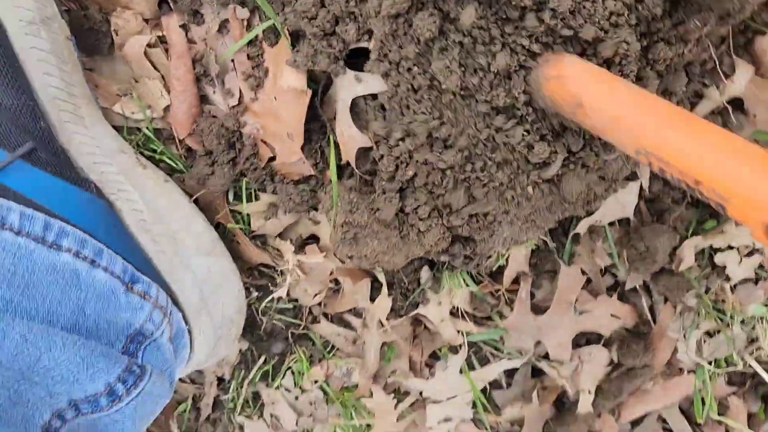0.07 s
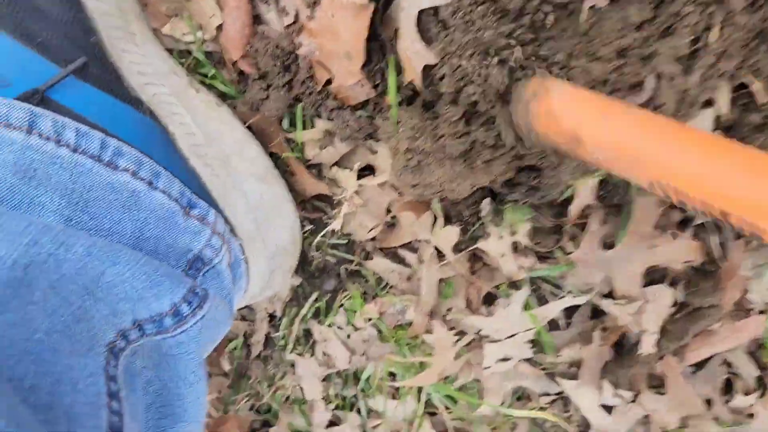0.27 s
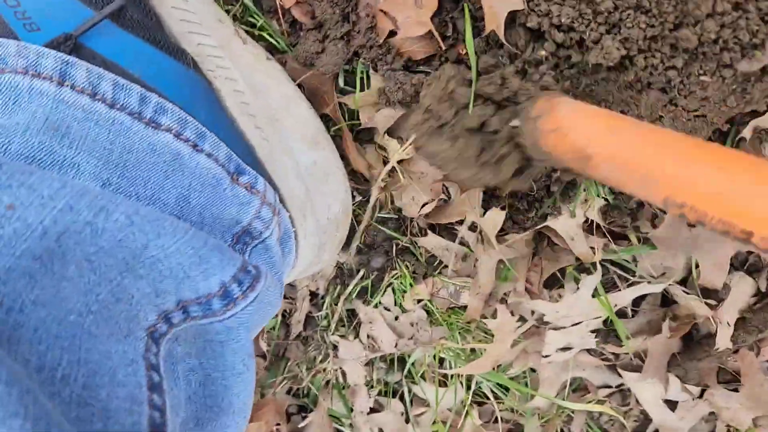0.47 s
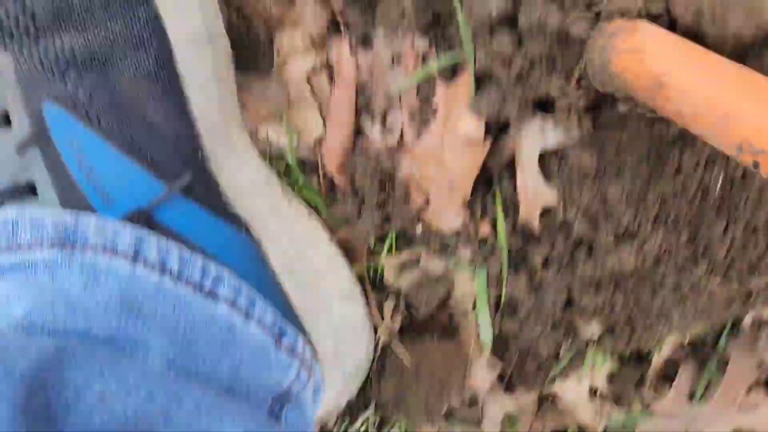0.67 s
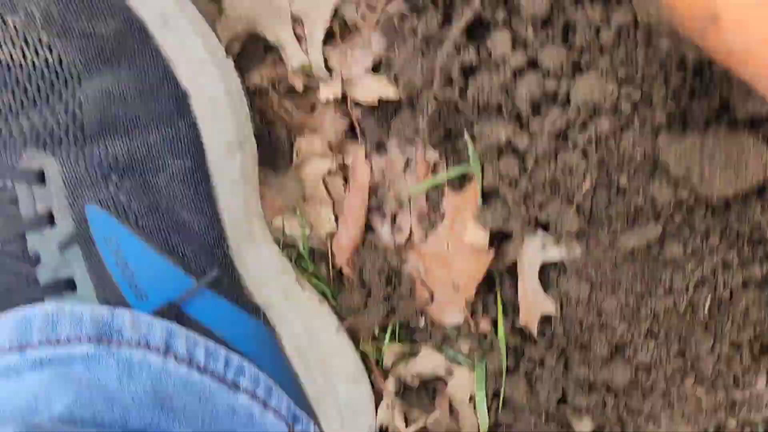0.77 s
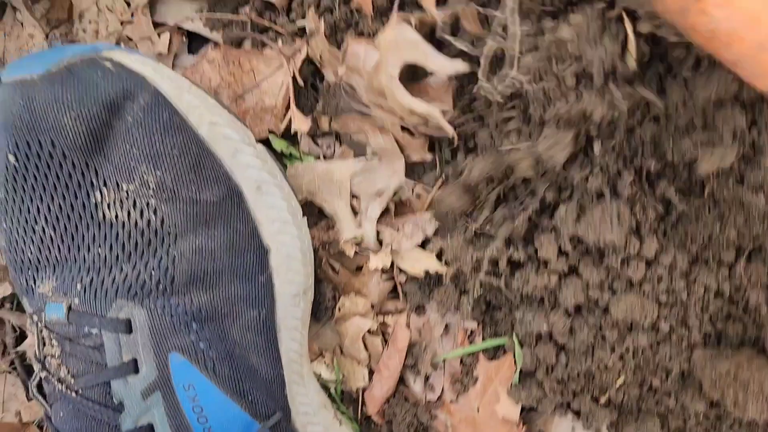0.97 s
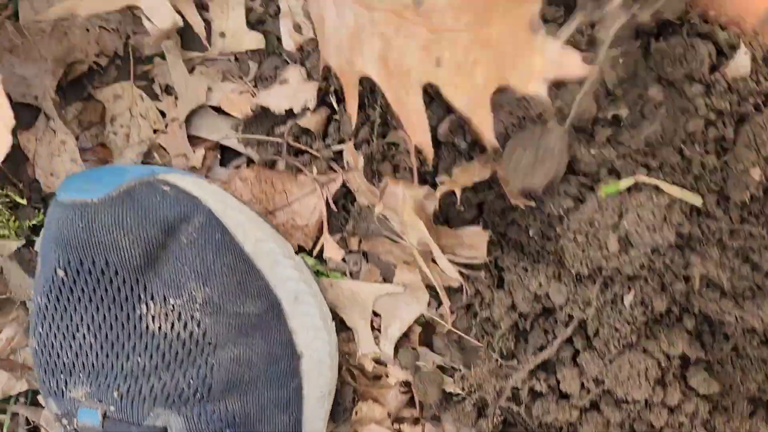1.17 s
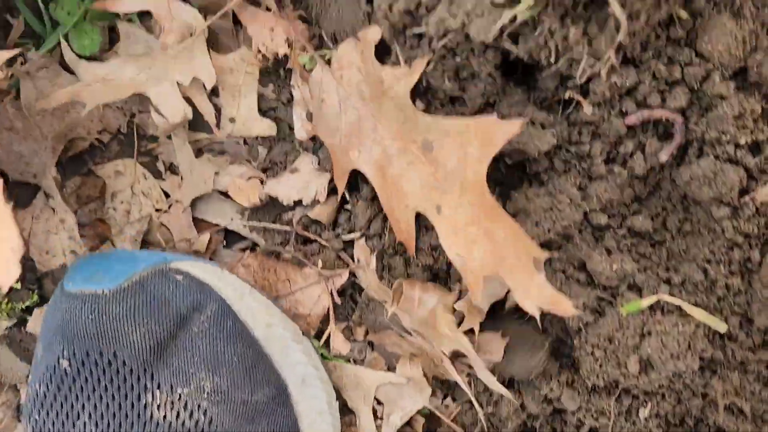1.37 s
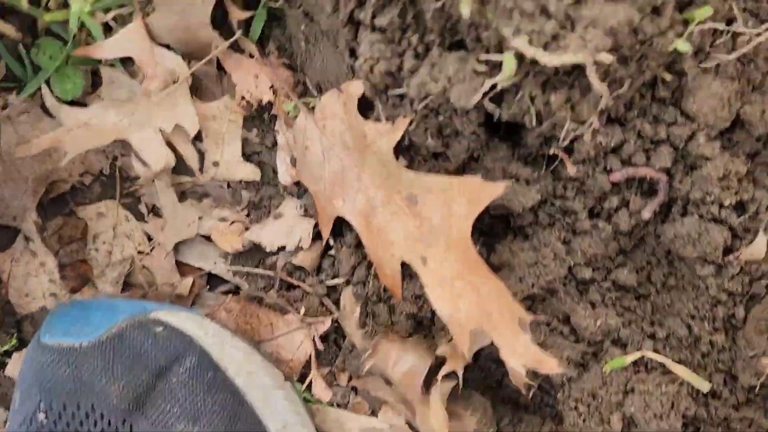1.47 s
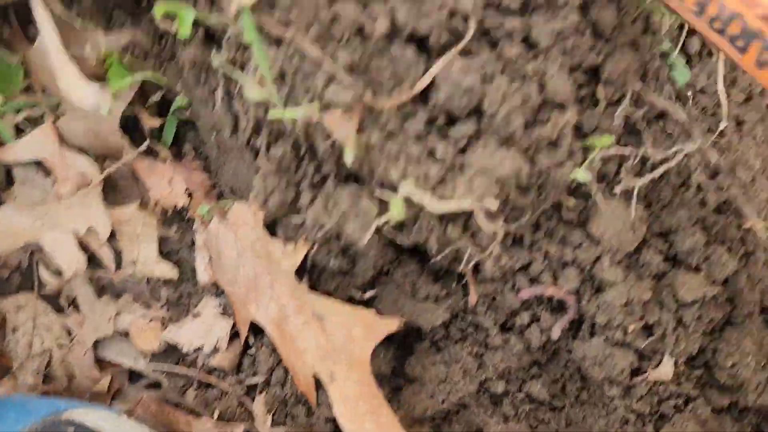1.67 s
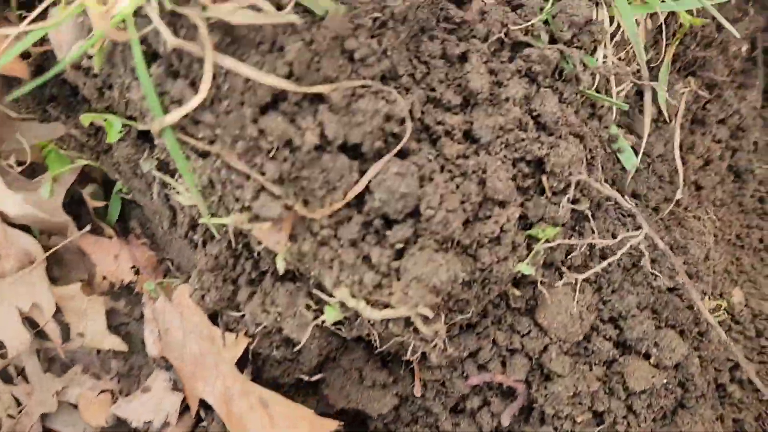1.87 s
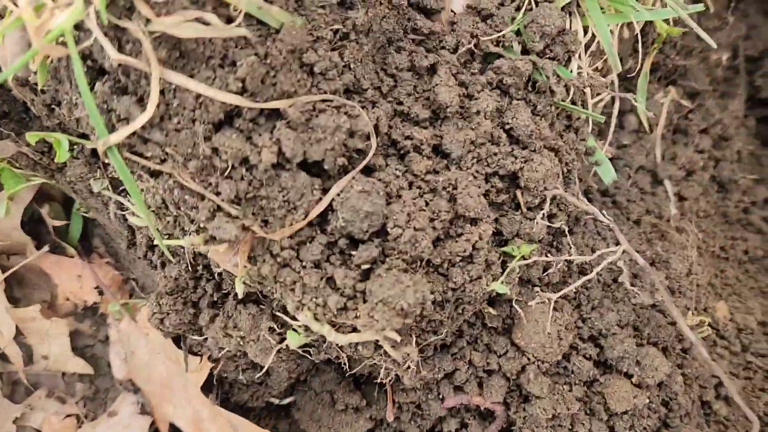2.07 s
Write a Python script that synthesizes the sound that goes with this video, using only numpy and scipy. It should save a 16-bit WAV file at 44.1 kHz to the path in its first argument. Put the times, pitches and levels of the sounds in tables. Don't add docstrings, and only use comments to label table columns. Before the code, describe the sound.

Close, crisp digging in earth and dry leaves, starting at once with gritty crunches and sharp snaps, denser around the middle, sparser later, then a last burst; behind it, a distant engine drones and road rumble swells, on a stereo phone microphone.

```python
import sys
import numpy as np
from scipy import signal
from scipy.fft import rfft, irfft, next_fast_len
from scipy.io import wavfile
from scipy.ndimage import uniform_filter1d

SR = 44100
rng = np.random.default_rng(int(sys.argv[2]) if len(sys.argv) > 2 else 0)


def attenuation_scalar(level_db):
    decades = np.asarray(level_db, float) / 20
    return 10 ** decades


def generate_wav(signal):
    frames = np.transpose(np.atleast_2d(signal))
    scaled = np.clip(frames, -1, 1) * 32767
    pcm = np.round(scaled).astype(np.int16)
    wavfile.write(sys.argv[1], SR, pcm)


N = 93403
CLUSTERS_PER_S = 320


def colour(x, points, causal=False):
    n = next_fast_len(x.shape[-1] + 4096) // 2 * 2
    f_hz, gain_db = np.array(points, float).T
    bins_hz = np.arange(n // 2 + 1) * SR / n
    log_gain = np.log(attenuation_scalar(np.interp(np.log(bins_hz + 1), np.log(f_hz), gain_db)))
    if causal:
        cepstrum = irfft(log_gain, n)
        cepstrum[1:n // 2] *= 2
        cepstrum[n // 2 + 1:] = 0
        log_gain = rfft(cepstrum)
    return irfft(rfft(x, n) * np.exp(log_gain), n)[..., :x.shape[-1]]


def band(x, hz, width_hz):
    return signal.lfilter(*signal.iirpeak(min(hz, .45 * SR), hz / width_hz, SR), x)


def unit(x):
    return x / np.sqrt(np.mean(x ** 2))


def walk(rate_hz):
    k = int(SR / rate_hz)
    steps = np.repeat(rng.standard_normal(N // k + 1), k)
    return unit(uniform_filter1d(uniform_filter1d(steps, k), k)[:N])


def sides(pan_db):
    return attenuation_scalar(np.array([pan_db, -pan_db]) / 2)


def decay(d_s, t60_s):
    return np.exp(-np.log(1000) * d_s / t60_s)


def grains(low_hz, count):
    spread_db, top_db, lag_s = 3, 10.5, .0005
    out = np.zeros((2, N))
    for hz in low_hz * 1.63 ** np.arange(5):
        u = rng.random((count, 4))
        at = (u[:, 0] * N).astype(int)
        lag = ((2 * u[:, 2] - 1) * lag_s * SR).astype(int)
        size = attenuation_scalar(np.minimum(-spread_db * np.log(u[:, 1] + 1e-9), top_db)) * np.sign(u[:, 3] - .5)
        hits = np.zeros((2, N))
        np.add.at(hits[0], at, size)
        np.add.at(hits[1], np.clip(at + lag, 0, N - 1), size)
        out += band(band(hits, hz, 0.45 * hz), hz, 1.5 * hz) * hz ** -.25
    return unit(out)


def trickle(t):
    # t/s, level/dB, left-right/dB
    effort = [(0.0, -68, -14), (0.15, -46, 1), (0.259, -50.5, -1), (.295, -56, 3), (.33, -49, 0),
              (0.5, -46.5, 2.5), (.7, -47, 0.5), (0.88, -44, -2), (1.05, -45.5, 2), (1.2, -44.5, 3.5),
              (1.35, -46.5, -1), (1.5, -52, 3.5), (1.68, -48.5, 3), (1.8, -52, -0.5), (1.97, -49.5, 1),
              (2.12, -45, -6)]
    patchy_db, cluster_db, hiss_db, trickle_db = 1.65, 3, -9, 4.5
    s, db, pan_db = np.array(effort).T
    flow = grains(2030, count=2500) * attenuation_scalar(patchy_db * walk(29.67) + cluster_db * walk(CLUSTERS_PER_S))
    dust = unit(colour(rng.standard_normal((2, N)), [(900, -34), (2500, 17)]))
    flow = flow + attenuation_scalar(hiss_db) * dust * attenuation_scalar(0.84 * walk(12.5))
    return flow * attenuation_scalar(np.interp(t, s, db) + trickle_db) * sides(np.interp(t, s, pan_db))


def crunches(t):
    # peak t/s, level/dB, rise/s, fall/s, left-right/dB
    clods = [(0.038, -21.5, 0.0058, 0.02, 1.5), (.112, -30.5, 0.0091, 0.0085, 0),
             (.43, -27, 0.03, 0.029, -2), (0.249, -28.5, 0.019, 0.0053, 1), (0.316, -23.5, 0.0025, 0.01, 3),
             (0.359, -20, 0.0068, 0.0096, -2), (.57, -25.5, 0.012, 0.047, 0.5), (.63, -20, 0.032, 0.019, 0),
             (.79, -26, 0.021, 0.031, 0), (.833, -22, .008, 0.0083, 1), (0.979, -19.5, 0.0077, 0.024, 4),
             (1.07, -24.5, 0.027, 0.014, 4), (1.169, -17.5, 0.012, 0.0064, 5.5),
             (1.24, -28.5, 0.025, 0.013, 4), (1.32, -23, 0.022, 0.0081, -0.5),
             (1.382, -21, 0.0081, 0.022, 1), (1.449, -25.5, 0.0059, 0.011, 5.5),
             (1.558, -14.5, 0.0034, .013, 1.5), (1.549, -24, 0.0021, .004, -4),
             (1.589, -24, 0.011, 0.0062, 0.5), (1.66, -20.5, 0.012, 0.016, -1),
             (1.949, -15.5, 0.012, 0.008, -5), (2.017, -23, 0.0051, 0.034, -4.5),
             (2.079, -27, 0.016, 0.017, -9)]
    crunch_db, crunch_hz, body_db, body_hz = -11.5, 5400, 4, 1700
    power = 0
    for s, db, rise_s, fall_s, pan_db in clods:
        d = np.where(t < s, (s - t) / max(rise_s, .001), (t - s) / max(fall_s, .001))
        power = power + attenuation_scalar(2 * db) * sides(2 * pan_db)[:, None] * np.exp(-d ** 1.21)
    swell = np.sqrt(power)
    dense = grains(2070, count=6000) * attenuation_scalar(2.3 * walk(CLUSTERS_PER_S))
    dense = unit(dense + 0.7 * band(dense, crunch_hz, 2800))
    body = unit(band(band(rng.standard_normal((2, N)), body_hz, 1800), body_hz, 2500))
    body = attenuation_scalar(body_db) * swell * body
    return attenuation_scalar(crunch_db) * swell * (dense + 0.39 * body)


def cracks(events, width, t60_s):
    crack_db, edge = -1, .6
    n = 2048
    out, d_s = np.zeros((2, N + n)), np.arange(n) / SR
    for s, db, hz, pan_db in events:
        hit = 0.25 * rng.standard_normal((2, n)) * decay(d_s, t60_s) + (d_s == 0)
        ring = band(band(hit, hz, min(width * hz, 9000)), hz, min(1.7 * width * hz, 12000))
        ring = ring + edge * min(width, 1) * band(ring, 12000, 6600) * min(hz / 8000, 1)
        level = attenuation_scalar(db + crack_db - np.array([[0], [pan_db]]))
        at = int(s * SR)
        out[:, at:at + n] += ring / np.abs(ring).max(1, keepdims=True) * level
    return out[:, :N]


def leaf_snaps():
    # t/s, peak/dB, f/Hz, left-right/dB
    leaves = [(.0388, -20.5, 6000, -2), (.2669, -26.5, 5170, 1), (.3086, -12.5, 5400, -2),
              (.3124, -16, 5800, -6.5), (.3153, -22, 6960, 0), (.5653, -23, 6700, 4),
              (.7717, -19, 13700, 0), (.8172, -24, 4900, 3), (.8337, -17, 12100, 6), (.9002, -22, 7500, 3),
              (.9138, -25, 6440, -2), (.9313, -23, 6300, 0), (1.0079, -22.5, 4460, 5),
              (1.0662, -18.5, 11600, 8), (1.0809, -15, 12600, 11), (1.171, -13, 6800, 1),
              (1.1715, -16, 13890, 4), (1.3386, -13, 5907, 3), (1.339, -20, 15000, 4),
              (1.3388, -13.5, 4300, 4), (1.3674, -19.5, 5300, 3), (1.4494, -14, 13890, 3),
              (1.6381, -24, 4570, 0), (1.7452, -21.5, 6840, 3), (1.9599, -21, 6020, -4),
              (2.0487, -18, 14600, 8)]
    return cracks(leaves, width=0.72, t60_s=0.007)


def twig_ticks():
    # t/s, peak/dB, f/Hz, left-right/dB
    twigs = [(.0584, -15, 2900, -5), (.1205, -19, 4500, 1), (.225, -13, 2900, -1), (.4975, -30, 2270, -3),
             (.5348, -25, 4500, 2), (.766, -16.5, 4300, 5), (.7922, -18, 5000, 1), (.8862, -23, 5000, -1),
             (.9785, -20, 5500, 2), (1.139, -28, 5770, 4), (1.161, -18, 6500, 5), (1.1915, -15, 5330, 5),
             (1.225, -16, 6200, 3), (1.428, -26, 7000, 2), (1.5548, -15, 5200, 0), (1.5575, -23, 5530, 7),
             (1.5625, -28, 5600, 4), (1.6605, -17, 3000, 1), (1.7228, -22, 5000, 1), (1.766, -29, 5500, 1),
             (1.796, -28, 5500, 1), (1.8798, -24.5, 5530, -1), (1.943, -21, 3300, -9),
             (1.956, -20, 12900, -12), (2.012, -25, 4500, -4), (2.071, -24, 7016, -6),
             (2.089, -22, 11500, -4)]
    return cracks(twigs, width=1.9, t60_s=0.0033)


def pebbles():
    # t/s, peak/dB, f/Hz, left-right/dB
    stones = [(0.19, -27.5, 1800, -1), (0.66, -22, 1750, 0), (.9512, -14.5, 3500, 9),
              (.944, -21.5, 6500, 5), (1, -19, 8000, 2), (1.3, -19, 1500, -1), (1.56, -15, 3600, 3),
              (1.556, -18, 6100, 3), (1.561, -12.5, 5600, 3), (1.152, -23, 5900, 4), (0.91, -22, 5600, 4)]
    return cracks(stones, width=0.21, t60_s=0.0083)


def thud(t):
    # f/Hz, width/Hz, level/dB
    modes = [(150, 74, 9), (346, 42, 1), (790, 170, 3.5), (1400, 120, -4.5)]
    thud_s, thud_db, t60_s, pan_db = .832, -34, 0.07, 4
    d_s = np.maximum(t - thud_s, 0)
    push = rng.standard_normal(N) * decay(d_s, t60_s) * (d_s > 0)
    push = push + 12 * (np.arange(N) == int(thud_s * SR))
    out = 0
    for hz, width_hz, db in modes:
        ring = band(band(push, hz, width_hz), hz, 2 * width_hz)
        out = out + attenuation_scalar(db) * ring / np.abs(ring).max()
    return out * attenuation_scalar(thud_db) * sides(pan_db)[:, None]


def ground(dig):
    t60_s, tail_db = 0.019, -11
    n = 2048
    tail = rng.standard_normal((2, n)) * decay(np.arange(n) / SR, t60_s)
    tail = tail / np.sqrt(np.sum(tail ** 2, 1, keepdims=True)) * attenuation_scalar(tail_db)
    return signal.fftconvolve(dig, tail, axes=1)[:, :N]


def engine(t):
    # t/s, firing f/Hz, level/dB, second order/dB
    run = [(0, 67.8, -22.5, -5), (.11, 70.8, -27, -1.5), (.2, 70.83, -28, 1), (.28, 72.26, -21, -14),
           (.5, 72.15, -27.5, -4.5), (.7, 72.33, -20.5, -11.5), (.81, 72.12, -25, -2.5),
           (.95, 71.15, -19, -14.5), (1.17, 70.85, -22, -10), (1.3, 66.77, -32.5, -3.5),
           (1.43, 65.76, -23, -5), (1.53, 64.3, -33, -6), (1.68, 64.08, -20.5, -10),
           (1.76, 63.14, -17.5, -28), (1.83, 63.32, -28, -3), (1.95, 63.3, -23, -2), (2.12, 63, -24.5, -3)]
    wobble, flutter_db, third_db = 0.008, 1.4, -17.5
    s, hz, db, second_db = np.array(run).T
    firing_hz = np.interp(t, s, hz) * (1 + wobble * walk(12.07))
    phase = 2 * np.pi * np.cumsum(firing_hz) / SR
    stack = 0
    for k, order_db in enumerate([0, np.interp(t, s, second_db), third_db]):
        level_db = order_db - 3.5 * k + flutter_db * (k + 2) * walk(25.08)
        stack = stack + attenuation_scalar(level_db) * np.sin((k + 1) * phase + k)
    return np.sqrt(2) * stack * attenuation_scalar(np.interp(t, s, db)) * sides(0.73 * walk(5.1))


def traffic(t):
    # f/Hz, density/dB per Hz
    spectrum = [(25, -2), (50, 0.5), (100, -7), (125, -4.5), (250, -16), (650, -26), (1150, -30),
                (2100, -29), (3000, -40.5)]
    # t/s, rumble/dB
    rumble = [(0.0, -46), (0.04, -28.5), (0.61, -41), (0.71, -36), (0.75, -37), (0.88, -27), (1.18, -33.5),
              (1.2, -22), (1.31, -29.5), (1.34, -41), (1.43, -29), (1.51, -32.5), (1.66, -26.5), (1.7, -40),
              (1.86, -31), (1.99, -41), (2.05, -31), (2.12, -40)]
    traffic_db, alike_hz = -24.5, 1010
    rumble_below_hz, rumble_mean_db = 60, -32.5
    tyres_from_hz, tyre_fade_db_per_s, roar_rise_db_per_s = 350, 1.46, 1
    pass_s, pass_half_s, pass_db = 0.9, 0.27, 3
    swell_db = np.interp(t, *np.array(rumble).T) - rumble_mean_db
    car_db = pass_db * np.exp(-((t - pass_s) / pass_half_s) ** 2)
    out = 0
    for hz in 28 * 2 ** np.arange(0, 7, .7):
        mid = band(rng.standard_normal(N), hz, hz / 2)
        side = band(rng.standard_normal(N), hz, hz / 2) * np.array([[1], [-1]])
        drift_db_per_s = -tyre_fade_db_per_s if hz > alike_hz else roar_rise_db_per_s * (hz > tyres_from_hz)
        db = 1.2 * walk(6.2) + drift_db_per_s * (t - 1)
        db = db + car_db * (hz > tyres_from_hz) + (hz < rumble_below_hz) * 1.02 * swell_db
        spread = hz / alike_hz
        out = out + attenuation_scalar(db) * (mid + np.clip(spread, .2, 1.1) * side) / np.hypot(1, min(spread, 1))
    return unit(colour(out, spectrum)) * attenuation_scalar(traffic_db)


def scene():
    t = np.arange(N) / SR
    dig = trickle(t) + crunches(t) + leaf_snaps() + twig_ticks() + pebbles() + thud(t)
    return dig + ground(dig) + engine(t) + traffic(t)


def band_limit(x):
    return signal.sosfilt(signal.butter(12, 16820, fs=SR, output="sos"), x)


def record(dry):
    # f/Hz, gain/dB
    left_port = [(1200, 0), (2600, -0.5), (5600, 2.5), (7500, 2.5), (8900, -12), (12000, -1), (15600, 0.5)]
    right_port = [(300, -0.5), (1500, -4.5), (2600, -7.5), (5000, -7.5), (7500, -10), (9000, -27.5),
                  (12000, 1.5), (15600, -8)]
    top_hz, end_fade_s = 15850, .002
    ports = np.array([colour(dry[0], left_port, causal=True), colour(dry[1], right_port, causal=True)])
    ports = signal.sosfilt(signal.butter(2, 22, "high", fs=SR, output="sos"), ports)
    ports = signal.sosfilt(signal.ellip(10, .3, 45, top_hz, fs=SR, output="sos"), ports)
    mix = ports * np.clip(np.arange(N)[::-1] / SR / end_fade_s, 0, 1)
    return band_limit(mix)


dry = scene()
out = record(dry)
generate_wav(out)
```